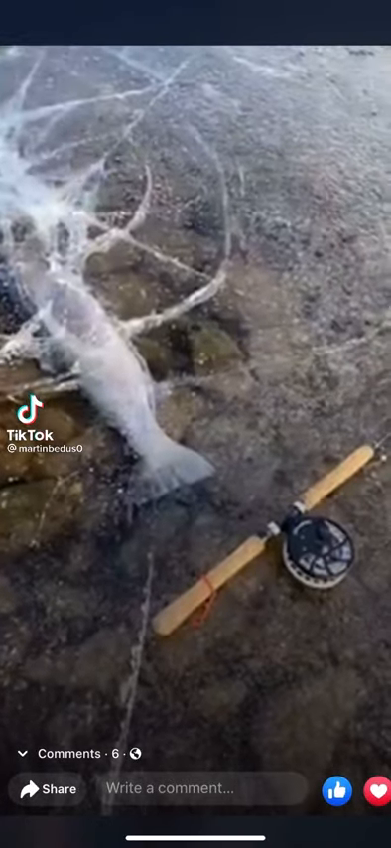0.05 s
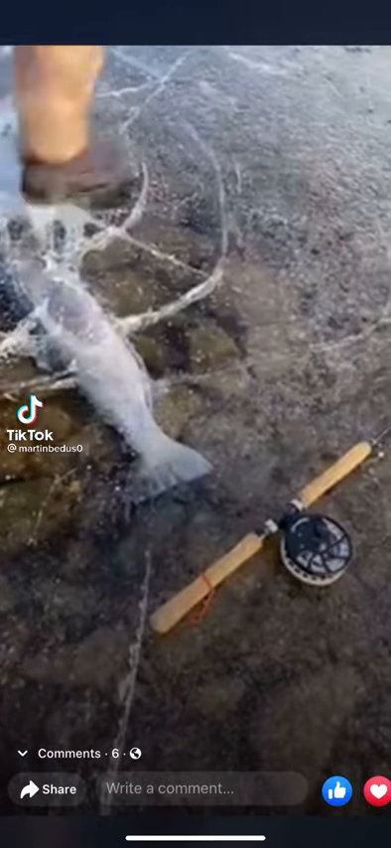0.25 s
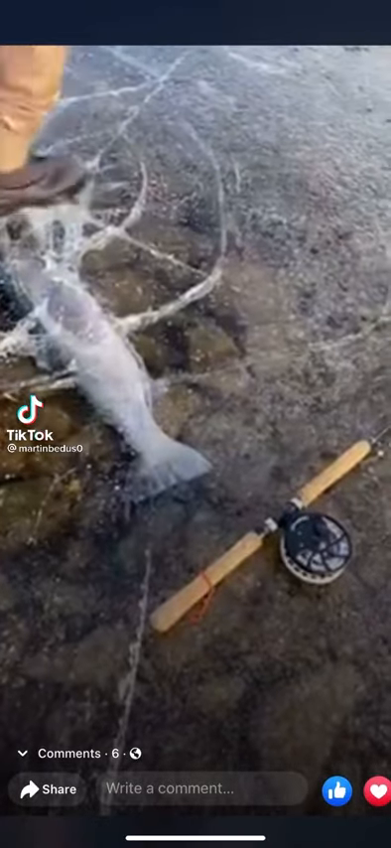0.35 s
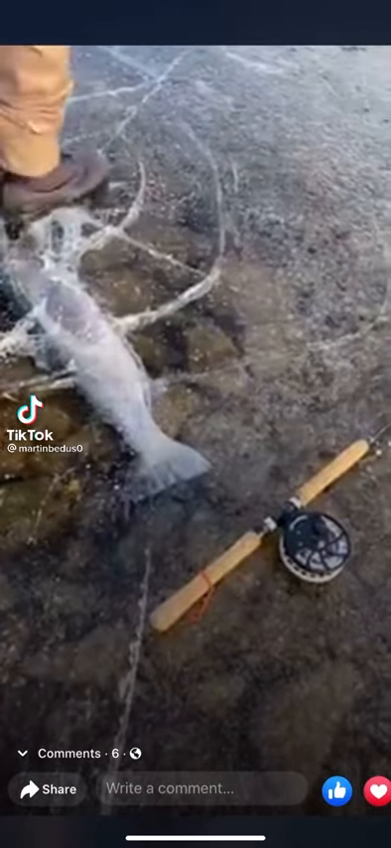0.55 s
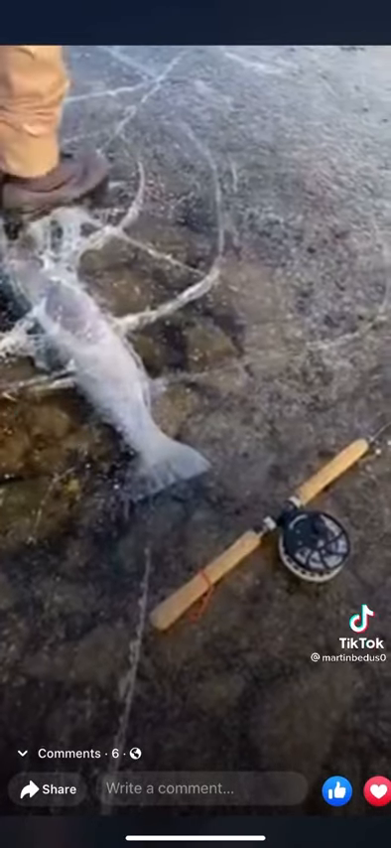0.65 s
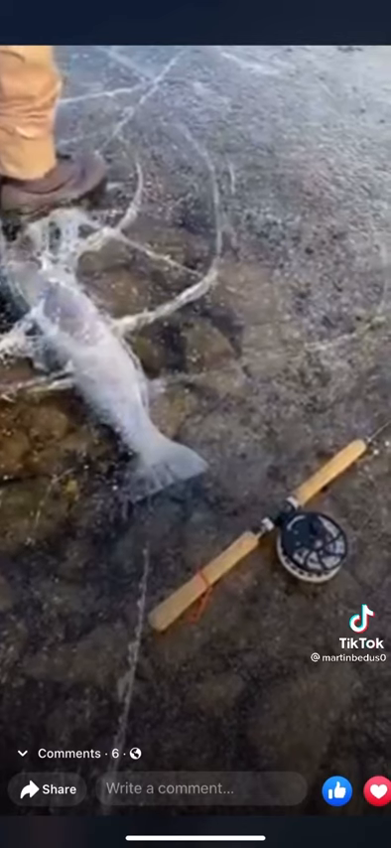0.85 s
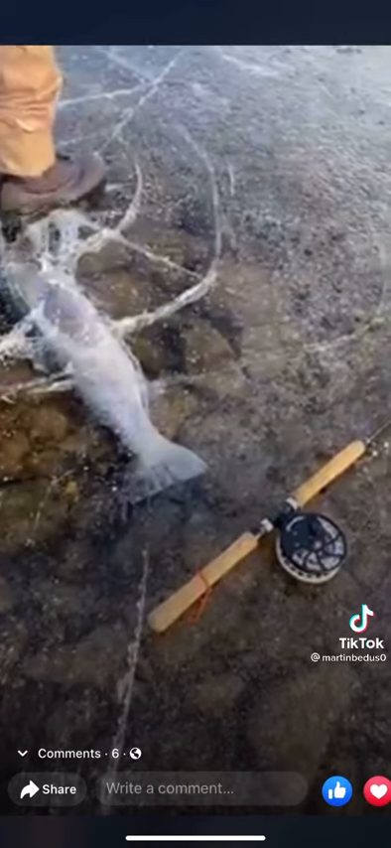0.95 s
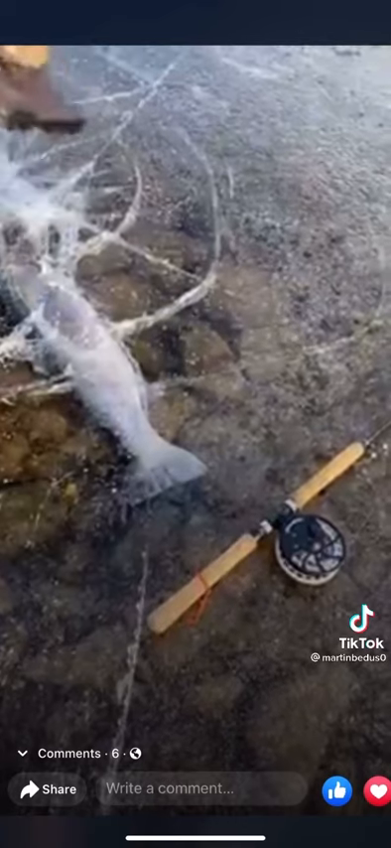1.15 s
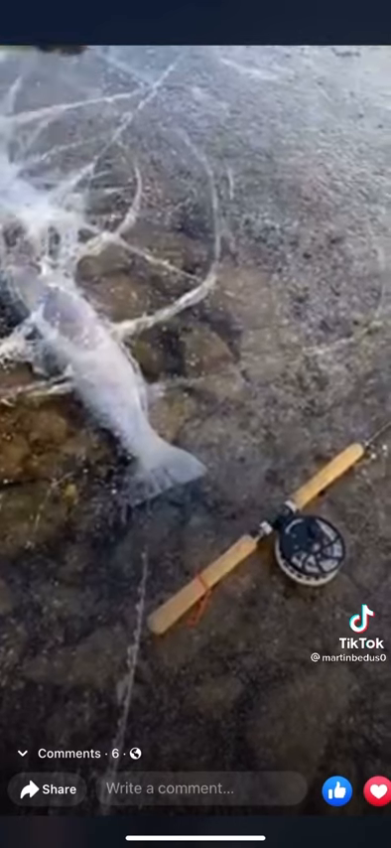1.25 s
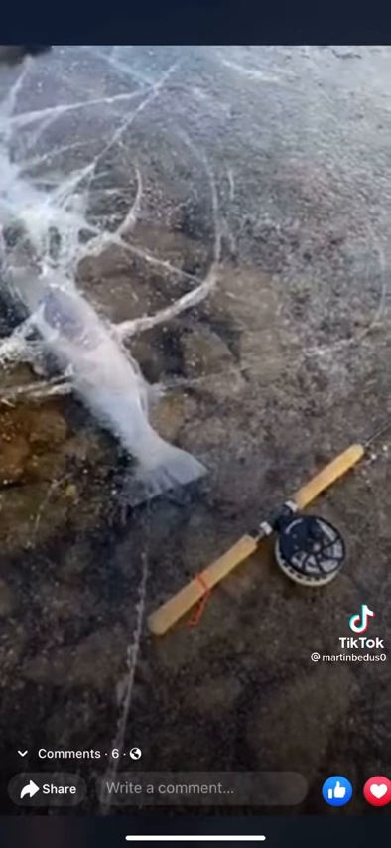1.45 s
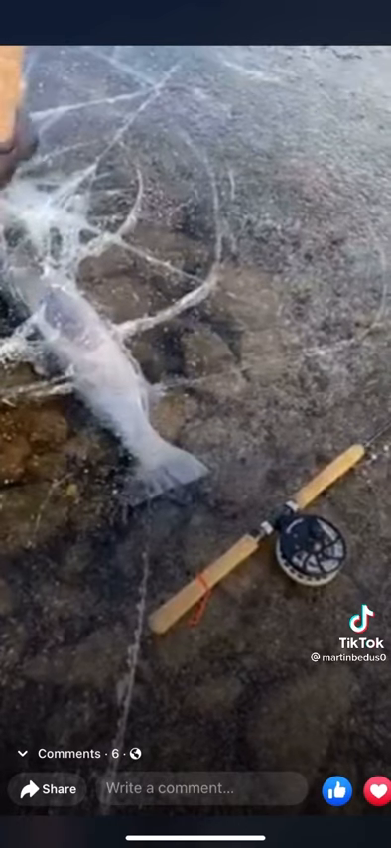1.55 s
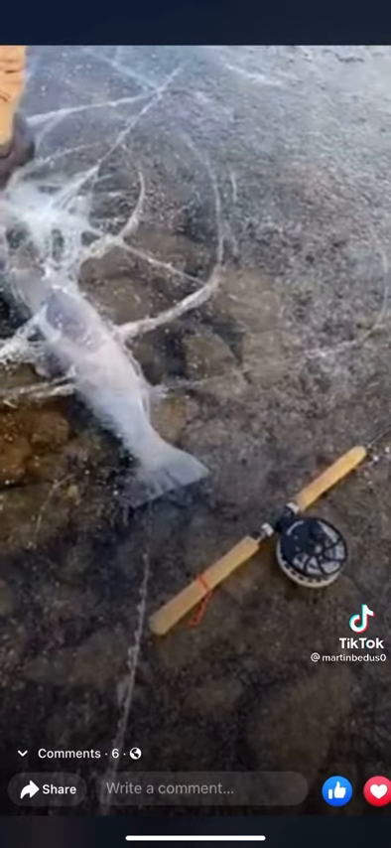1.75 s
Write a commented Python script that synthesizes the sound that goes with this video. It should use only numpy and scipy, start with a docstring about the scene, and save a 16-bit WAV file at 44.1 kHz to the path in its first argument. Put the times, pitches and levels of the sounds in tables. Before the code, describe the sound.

Ice cracks sharply under two close boot stamps outdoors, the first loud enough to distort the microphone, the second softer. Each leaves a short thud and crunch, while small ice snaps, ticks and faintly stirring slush fill the gap.

```python
"""Two boot stamps crack lake ice, so close that the microphone overloads on the first, louder one.
Each stamp cracks, sends short falling bending waves through the sheet and leaves a crunch,
while the slab rings and rocks on the water and the sole slaps flat. Around the stamps the broken
ice snaps and ticks and slush stirs as the boot shifts, over quiet outdoor air."""
import sys
import numpy as np
from scipy import signal
from scipy.io import wavfile

SR = 44100
rng = np.random.default_rng(int(sys.argv[2]) if len(sys.argv) > 2 else 0)


def log_audio(samples):
    """Write samples as a 16-bit WAV file to the path given in sys.argv[1]."""
    # one column per channel
    frames = np.atleast_2d(samples).T
    # limit to full scale, then quantise
    limited = np.clip(frames, -1, 1)
    pcm = np.round(limited * 32767).astype(np.int16)
    wavfile.write(sys.argv[1], SR, pcm)


N = 79380
TIME = np.arange(N) / SR

# Modes of the ice slab: pitch_hz, level_db, width_hz
SLAB_MODES = [(417, 8, 53), (843, -2, 98), (1105, -9.5, 23), (1387, -24, 210), (1936, -1.5, 48),
              (2250, -3.5, 67), (2670, 0.5, 110), (3960, -3.5, 150), (5020, 3, 13), (5450, -1, 240)]
# Spectrum of crushed ice: frequency_hz, gain_db
CRUNCH_SPECTRUM = [(60, 7), (150, -17), (260, 11), (450, 6), (900, 0), (2000, -1.5), (3300, -2.5),
                   (5200, -3.5), (6500, -9.5), (9000, -12)]


def stamps():
    """The sole brushes loose ice, then the full weight lands and bends the sheet."""
    # Boot blows: start_s, crack_db, crack_length_s, crack_pitch_ratio, splinter_hz, splinter_db,
    # ring_db, crunch_db, heave_db, scuff_db, scuff_hz
    blows = [(.2332, -0.5, 0.0017, 1, 4880, -14, -19.5, -21.5, -28.5, -24, 443),
             (1.5157, -10, 0.0027, .8, 4020, -18.5, -22, -24, -27.5, -27.5, 675)]
    # Bending waves, a knock and then the thud of the weight:
    # start_s, top_hz, first_octave_fall_s, level_db, attack_s
    waves = [(.2327, 622, .0143, -4, .003), (.2395, 162, .022, -7.8, .005),
             (1.5159, 1113, .0115, -6, .0017), (1.5193, 321, .012, -2.5, .0018),
             (1.5243, 275, .0047, -6, .0026)]
    out = np.zeros(N)
    for (start_s, crack_db, length_s, pitch_ratio, splinter_hz, splinter_db,
         ring_db, crunch_db, heave_db, scuff_db, scuff_hz) in blows:
        out += amp(scuff_db) * scuff(start_s, scuff_hz)
        impact = amp(crack_db) * crack(length_s, pitch_ratio) + amp(splinter_db) * splinter(splinter_hz)
        tail = amp(ring_db) * ring() + amp(crunch_db) * crunch() + amp(heave_db) * heave()
        add(out, start_s, impact + tail)
    for start_s, top_hz, fall_s, level_db, attack_s in waves:
        add(out, start_s, amp(level_db) * bending_wave(top_hz, fall_s, attack_s))
    return out


def crack(length_s, pitch_ratio):
    """The heel breaks the ice: a few milliseconds of dense fracture."""
    # Spectrum of the fracture at pitch ratio 1: frequency_hz, gain_db
    spectrum = [(200, -39.5), (550, -3), (780, 4.5), (1000, -2.5), (1400, 2), (2200, -3.5), (3000, -12.5),
                (4200, -20.5), (6300, -23.5), (9000, -22.5)]
    fracture = colour(rng.standard_normal(N), [(hz * pitch_ratio, db) for hz, db in spectrum])
    return shaped(fracture, attack(0.00077) * fade(TIME - length_s, t60_s=0.013))


def bending_wave(top_hz, fall_s, attack_s):
    """The treble travels faster through the sheet, so each blow arrives as a short falling chirp."""
    pitch_hz = top_hz / (1 + TIME / fall_s)
    return swell(attack_s) ** 1.05 * np.sin(2 * np.pi * np.cumsum(pitch_hz) / SR)


def splinter(pitch_hz):
    """A shard breaks off with a brief high ring."""
    shard = resonate(rng.standard_normal(N), pitch_hz, width_hz=250)
    return shaped(shard, attack(0.00096) * fade(TIME - 0.0015, t60_s=0.03))


def ring():
    """The breaking ice rattles the slab, which rings unevenly."""
    rattle = grains(per_s=3400, spread_db=0.5)
    modes = sum(amp(db) * unit(band(rattle, hz, 2 * width)) for hz, db, width in SLAB_MODES)
    return shaped(modes, attack(0.0049) * fade(TIME, t60_s=0.16))


def crunch():
    """Crushed ice crackles in a short burst, then settles in a long quiet tail."""
    crackle = in_slab(colour(grains(per_s=5000, spread_db=2.5), CRUNCH_SPECTRUM))
    decay = fade(TIME, t60_s=0.15) + amp(-16.5) * fade(TIME, t60_s=1.41)
    return shaped(crackle, attack(0.0032) * decay)


def heave():
    """The sheet rocks on the water with a low rumble."""
    # Spectrum of the rocking sheet: frequency_hz, gain_db
    spectrum = [(15, -32), (40, -2), (70, -5.5), (130, -9.5), (250, -25.5), (800, -95)]
    return shaped(colour(rng.standard_normal(N), spectrum), swell(peak_s=0.02))


def scuff(blow_s, pitch_hz):
    """The sole scuffs loose ice, rising into the blow and cutting off just after it."""
    grit = grains(per_s=12000, spread_db=9.0)
    body = unit(band(grit, pitch_hz, width_hz=73))
    hiss = unit(colour(grit, CRUNCH_SPECTRUM, tilt_db=-0.5))
    envelope = np.exp(-abs(TIME - blow_s) / 0.0076) * (TIME < blow_s + 0.002)
    return shaped(body + amp(1.5) * hiss, envelope)


def snaps():
    """Ice snaps under load: a short run of tiny fractures excites three resonances of a shard."""
    # Snaps, with the last three levels relative to the main resonance:
    # start_s, length_s, level_db, main_hz, second_hz, second_db, third_hz, third_db, hiss_db
    shards = [(0.2048, 0.0088, -27, 2880, 3840, -7, 1750, -15, -4),
              (0.3709, 0.006, -33.5, 3160, 2230, -6.5, 5730, -13, -3),
              (.477, 0.0027, -36, 1890, 4470, -1.5, 1240, -6, 0),
              (0.6137, 0.01, -45.5, 4540, 3360, -4, 1920, -14, -1.5),
              (0.636, 0.013, -55, 4360, 2270, -16, 6020, -8, 9.5),
              (0.8521, 0.008, -38, 1920, 2410, -8, 4280, -9, -3),
              (0.9274, 0.0017, -34, 5040, 6780, -6.5, 8420, -15, -12),
              (1.7005, 0.006, -41, 3910, 5850, -5, 4840, -3.5, 0),
              (1.768, 0.0034, -31.5, 4470, 1980, -3.5, 2950, -2.5, -7.5)]
    # Spectrum of the fracture hiss: frequency_hz, gain_db
    hiss_spectrum = [(300, -47), (1000, 5), (1500, -5), (3100, 5), (3700, -9.5), (4700, 2), (6200, -6),
                     (9000, -16.5)]
    out = np.zeros(N)
    for start_s, length_s, db, main_hz, second_hz, second_db, third_hz, third_db, hiss_db in shards:
        envelope = attack(0.083 * length_s) * fade(TIME - length_s, t60_s=0.02)
        slips = grains(per_s=7000, spread_db=7.5)
        main, second, third = (shaped(resonate(slips, hz, width_hz=47), envelope)
                               for hz in (main_hz, second_hz, third_hz))
        hiss = shaped(colour(slips, hiss_spectrum), envelope)
        snap = main + amp(second_db) * second + amp(third_db) * third + amp(hiss_db) * hiss
        add(out, start_s, amp(db) * snap)
    return out


def ticks():
    """Loose chips click against the ice with hardly any ring."""
    # Chip hits: start_s, relative_db, pitch_hz
    hits = [(.0862, -44, 2260), (.167, -32.5, 1600), (0.2956, -33.5, 1020), (0.4926, -46, 1680),
            (0.58, -45, 3720), (0.9647, -45.5, 1290), (1.0166, -45, 1920), (1.1703, -36.5, 815),
            (1.282, -34, 2220), (1.3176, -42, 1810), (1.3555, -42, 2700), (1.374, -34, 880),
            (1.3932, -42.5, 2040), (1.4357, -43, 2070), (1.4564, -40.5, 1120), (1.638, -32.5, 1730),
            (1.732, -45, 5160), (1.755, -44.5, 3400)]
    out = np.zeros(N)
    for start_s, db, hz in hits:
        chip = resonate(grains(per_s=4400, spread_db=-5), hz, width_hz=0.37 * hz)
        add(out, start_s, amp(db) * shaped(chip, fade(TIME - 0.001, t60_s=0.028)))
    return out


def slaps_and_slush():
    """The sole slaps flat in a short crunch after each stamp; slush stirs softly in between."""
    # Sole slaps (the two loudest rows) and slush stirs: peak_s, half_length_s, relative_db, centre_hz
    moves = [(0.094, 0.057, -49.5, 2760), (0.265, 0.0088, -29.5, 440), (0.439, 0.024, -39.5, 463),
             (0.493, 0.027, -40, 1770), (0.498, 0.013, -42.5, 414), (1.196, 0.092, -47, 370),
             (1.252, 0.046, -46, 149), (1.236, 0.08, -51, 3540), (1.34, 0.025, -50, 242),
             (1.398, 0.093, -54, 1520), (1.54, 0.012, -27.5, 880), (1.618, 0.025, -43.5, 2610)]
    out = np.zeros(N)
    for peak_s, half_length_s, db, hz in moves:
        wet_grit = band(grains(per_s=1500, spread_db=2), hz, width_hz=1.48 * hz)
        out += amp(db) * shaped(wet_grit, np.exp(-((TIME - peak_s) / half_length_s) ** 2))
    return out


def air():
    """Quiet outdoor noise with a faint crackle, gently wavering."""
    # Spectrum of the outdoor bed: frequency_hz, gain_db
    spectrum = [(20, -25), (45, 1), (72, 9), (130, 1), (250, -9), (400, -4), (700, -9), (2000, -11),
                (3300, -18), (5200, -16), (6500, -24), (9000, -20)]
    # Slow level ride of the bed: time_s, gain_db
    ride = [(0, -5), (.06, 1.5), (.55, 1), (.75, 0.5), (.95, 1.5), (1.08, -1), (1.2, 2), (1.8, -1.5)]
    waver = unit(sum(np.sin(2 * np.pi * (hz * TIME + rng.random())) / np.sqrt(hz)
                     for hz in np.geomspace(2, 25, 20)))
    hiss = rng.standard_normal(N) + amp(-7) * grains(per_s=350, spread_db=6.5)
    gain_db = -47.5 + np.interp(TIME, *np.transpose(ride)) + 1.2 * waver
    return amp(gain_db) * unit(colour(hiss, spectrum))


def in_slab(x):
    """Sound that passes through the ice picks up the slab's resonances."""
    return x + amp(-6.5) * sum(resonate(x, hz, width) for hz, _, width in SLAB_MODES)


def amp(db):
    """Decibels to gain."""
    return 10 ** (np.asarray(db) / 20)


def unit(x):
    """Scales to rms 1."""
    return x / np.sqrt(np.mean(x ** 2) + 1e-20)


def attack(rise_s):
    """A straight ramp up to full level."""
    return np.minimum(TIME / rise_s, 1)


def fade(t, t60_s):
    """Full level up to time zero, then an exponential decay."""
    return np.exp(-np.log(1000) * np.maximum(t, 0) / t60_s)


def swell(peak_s):
    """A rounded rise to full level and a slower fall."""
    return TIME / peak_s * np.exp(1 - TIME / peak_s)


def shaped(x, envelope):
    """Puts an envelope on a noise so that the burst has the envelope's energy."""
    return unit(x * envelope) * np.sqrt(np.mean(envelope ** 2))


def add(mix, start_s, sound):
    """Mixes a sound in at a time."""
    part = mix[max(round(start_s * SR), 0):][:len(sound)]
    part += sound[:len(part)]


def grains(per_s, spread_db):
    """Random clicks of uneven size."""
    size = amp(spread_db * np.minimum(rng.exponential(1, N), 4))
    return unit(size * rng.choice([-1, 1], N) * (rng.random(N) < per_s / SR))


def resonate(x, hz, width_hz):
    """One band-pass resonance."""
    return signal.lfilter(*signal.iirpeak(min(hz, SR / 3), hz / min(width_hz, SR / 5), SR), x)


def band(x, hz, width_hz):
    """Two equal resonances in series, for steeper skirts."""
    return resonate(resonate(x, hz, width_hz), hz, width_hz)


def colour(x, spectrum, tilt_db=0):
    """Minimum-phase EQ from a spectrum table, with a tilt per octave in the treble."""
    size = 8192
    hz = abs(np.fft.fftfreq(size, 1 / SR))
    point_hz, point_db = np.transpose(spectrum)
    curve_db = np.interp(np.log(hz + 1), np.log(point_hz + 1), point_db)
    log_gain = np.log(amp(curve_db + tilt_db * np.log2(hz / 1000 + 1)))
    taps = np.fft.ifft(np.exp(np.conj(signal.hilbert(log_gain)))).real[:size // 2]
    return signal.fftconvolve(x, taps)[:len(x)]


def scene():
    """Stamps and snaps up front, the small sounds coloured by the slab behind them, in mono."""
    return (stamps() + snaps() + amp(-1) * in_slab(ticks() + slaps_and_slush() + air()))[None]


def record(dry):
    """A dull microphone clips on the first, louder stamp; a 16.1 kHz low-pass trims the top."""
    # Microphone response: frequency_hz, gain_db
    response = [(20, -0.5), (6600, -1), (7050, -15), (7400, -22.5), (7900, -6), (8450, -1), (8750, -22),
                (9300, -41), (11000, -81)]
    clipped = np.clip(colour(dry[0], response), -1, 1)
    low_pass = signal.firwin(255, 16100, window=("kaiser", 9), fs=SR)
    return signal.fftconvolve(clipped, low_pass, "same")[None]


dry = scene()
out = record(dry)
log_audio(out)
```